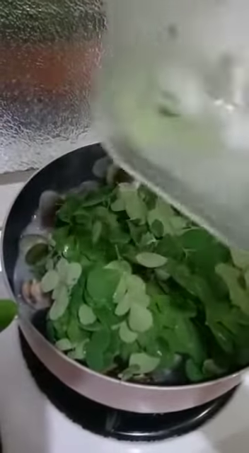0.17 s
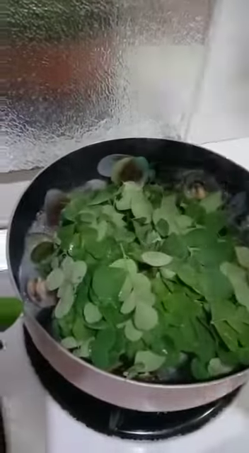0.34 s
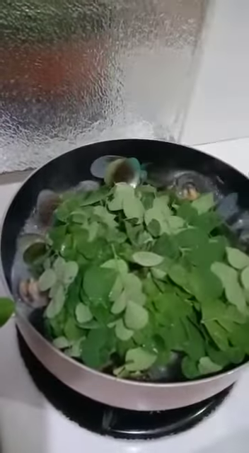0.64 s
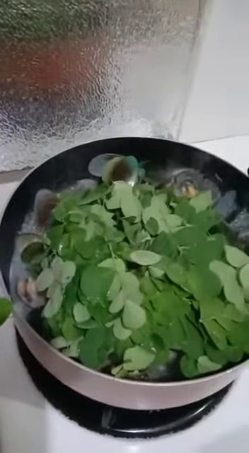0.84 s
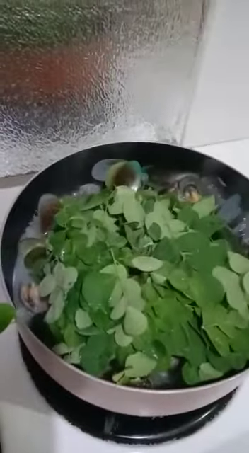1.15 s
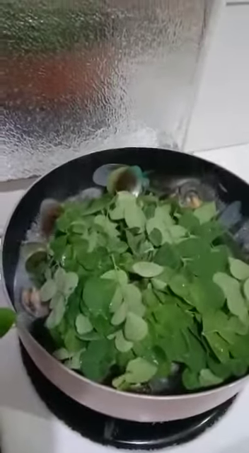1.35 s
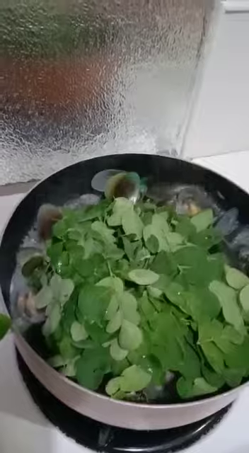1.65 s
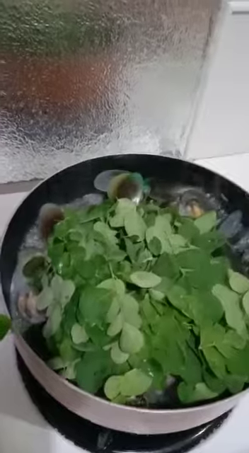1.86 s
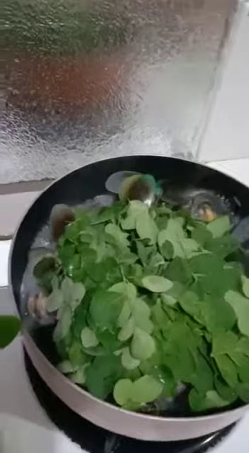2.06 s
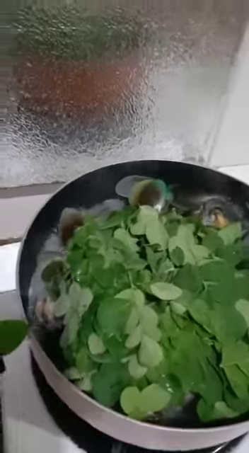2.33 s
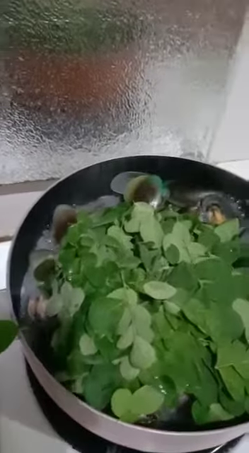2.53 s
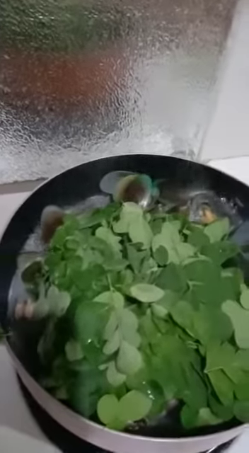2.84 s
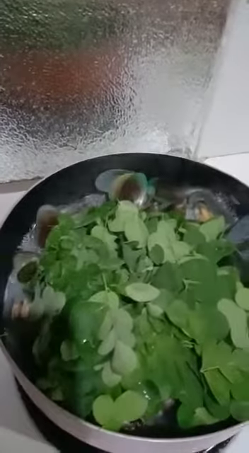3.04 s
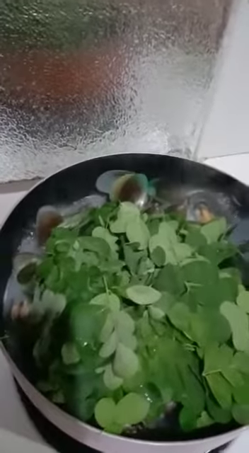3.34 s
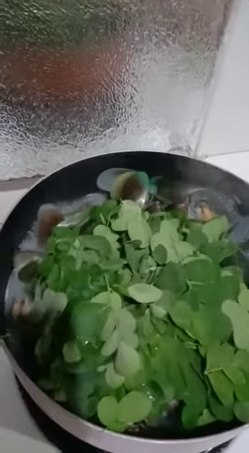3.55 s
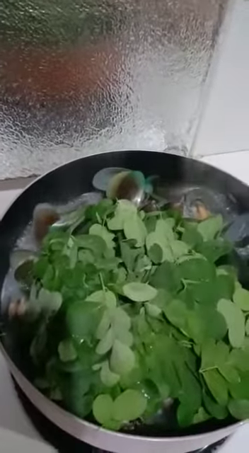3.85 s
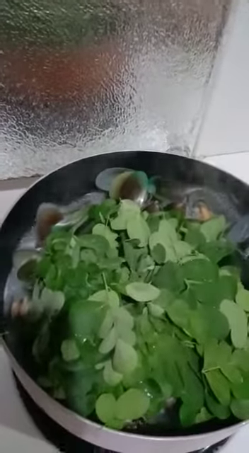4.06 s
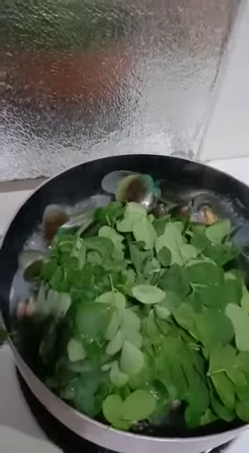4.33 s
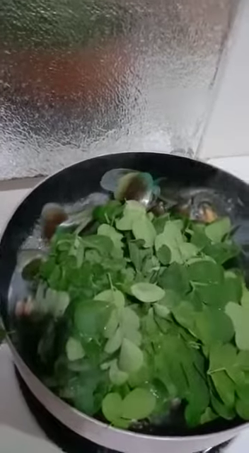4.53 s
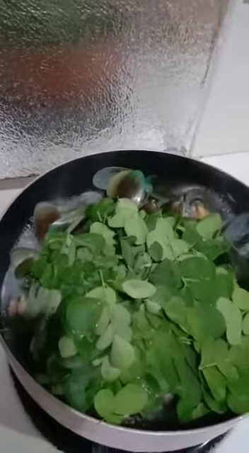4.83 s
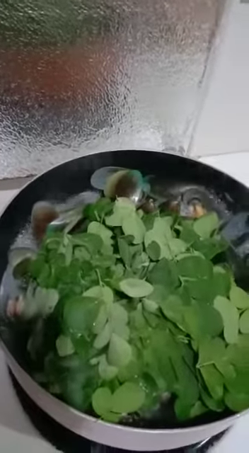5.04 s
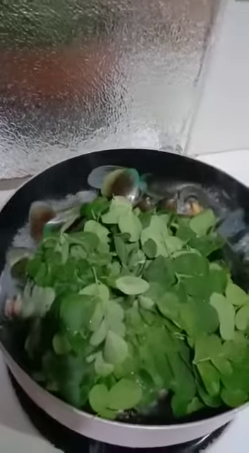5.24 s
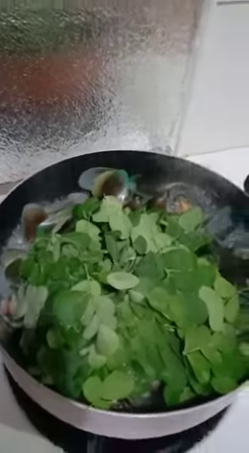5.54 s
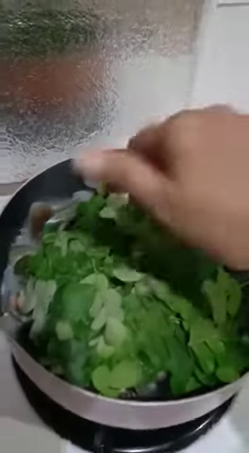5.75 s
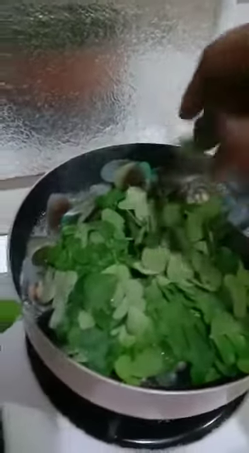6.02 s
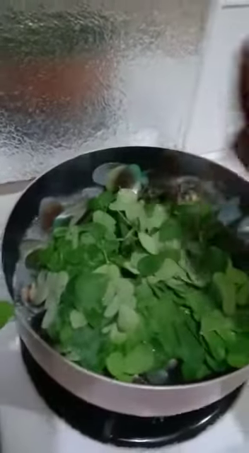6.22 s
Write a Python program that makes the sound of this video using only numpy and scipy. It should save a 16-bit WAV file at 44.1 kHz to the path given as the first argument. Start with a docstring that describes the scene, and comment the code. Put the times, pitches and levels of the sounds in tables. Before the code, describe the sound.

Gentle bubbling and fizzing come from a nearby pan on a stove, over a low steady hum. Early on, a metal bowl lands with a loud, bright clink, followed by a run of lighter pot knocks, brief scrapes and small rim tings. After that only the simmer remains, with a few blips, tiny spits and a soft rustle as a hand presses the leaves down. Hard kitchen walls add a short tail.

```python
"""Small tiled kitchen: a pan of greens simmers over a low electric hum.
Bursting bubbles make a wash, fizz and plops and keep the pan faintly ringing; water spits on its
hot wall, a hand pushes the leaves down. A metal bowl is put down with one sharp clink, then
kitchenware is shifted, scraped and knocked. Blows ring decaying modes; scrapes are tiny slips.
The hard walls add a short tail."""
import sys
import numpy as np
from scipy import signal
from scipy.fft import rfft, irfft, next_fast_len
from scipy.io import wavfile
from scipy.ndimage import uniform_filter1d

SR = 44100
rng = np.random.default_rng(int(sys.argv[2]) if len(sys.argv) > 2 else 0)


def to_wav(s):
    """Save 16-bit WAV."""
    ch = np.atleast_2d(s).T  # columns
    pcm = np.round(np.clip(ch, -1, 1) * 32767)  # PCM
    wavfile.write(sys.argv[1], SR, pcm.astype(np.int16))


N = 281490
TIME_S = np.arange(N) / SR

# Boil strength contour: t/s, relative level/dB (compressed in simmer)
BOIL = [(0.0, -54.5), (0.21, -61.5), (0.62, -63.5), (1.31, -59), (3.71, -57), (4.35, -60), (4.87, -54),
        (5.47, -61), (5.85, -56.5), (6.38, -68)]
# Simmer spectra: f/Hz, relative density/dB
WASH_SPECTRUM = [(25, -40), (50, -19), (80, -0.5), (140, 7), (185, -3.5), (300, -1.5), (480, -6),
                 (640, -3.5), (900, -10.5), (1550, -12), (2100, -10), (2650, -15.5), (3500, -15.5),
                 (7000, -39.5)]
FIZZ_SPECTRUM = [(3000, -5.5), (3900, -4), (4400, -6), (5000, -1.5), (5600, -0.5), (6300, -10.5),
                 (6800, -6.5), (7400, -3), (8050, -12), (8800, -11), (10000, -7), (11200, -14),
                 (13700, -25), (14900, -11.5)]
# Pan modes: f/Hz, level/dB, t60/s, bubble rate/(1/s)
PAN_MODES = [(1163, -63, 0.063, 200), (1230, -61.5, 0.088, 190), (1277.4, -59.5, 0.11, 200),
             (2118, -78, 0.09, 70), (2978, -73, 0.029, 67), (3224, -74.5, 0.12, 100),
             (3785, -77.5, 0.17, 78), (5090, -77.5, 0.16, 100), (5660, -76, 0.043, 120),
             (6900, -81, 0.074, 140), (8850, -81.5, .04, 140), (9500, -82.5, 0.064, 150)]
# Largest bubbles: t/s, level/dB, f/Hz
BIG_BUBBLES = [(0.192, -46, 1240), (0.306, -39.5, 1230), (1.728, -41.5, 1255), (4.4654, -37, 1247),
               (4.938, -43.5, 340), (5.771, -43, 1327), (5.93, -49, 1620)]
# Water spits: t/s, level/dB
SPITS = [(1.964, -64.5), (3.483, -59), (4.781, -59.5), (4.88, -56.5)]
# Leaf rustles; kitchenware scrapes, the last row a bubble's brief burst at the pan: t/s, length/s, level/dB,
# centre f/Hz, width/oct
LEAF_RUSTLES = [(5.745, 0.057, -54, 640, 1.0), (5.95, .042, -57, 398, .45)]
SCRAPES = [(1.868, 0.032, -42.5, 1080, 1), (1.954, 0.022, -44, 3410, 0.1), (1.957, 0.05, -53.5, 4120, 0.42),
           (2.672, 0.0089, -49.5, 4130, 0.54), (2.971, 0.071, -42, 900, 1.29),
           (3.078, 0.035, -43, 1140, 1.3), (3.609, 0.016, -52, 2000, 1.2),
           (4.336, 0.019, -47.5, 2060, 0.31), (5.193, 0.031, -55.5, 2100, 0.29)]
# Modes of bowl (wall damped, rim clear), pot and pot rim: f/Hz, level/dB, t60/s
BOWL_MODES = [(1150, -4, .03), (1211, -13, .17), (1258, -15, .28), (1444, -26, .2), (2170, -21, .2),
              (2260, -5, .018), (2690, -6, .022), (3290, -26, .2), (3321, -23.5, .3), (3350, -26, .18),
              (5052, -31, .22), (6735, -15, .075), (6760, -31, .15), (8355, -37, .23), (9313, -28.5, .1),
              (10480, -39, .15), (11570, -49, .14), (14240, -48, .1)]
POT_MODES = [(790, -7, .02), (1010, -2, .022), (1110, 3, .026), (1270, -12, .11), (1850, -17, .28),
             (2000, -13, .02), (3370, -23, .15)]
RIM_MODES = [(3645, 5, 0.038), (5000, -12, 0.042), (6880, -16.5, 0.09), (8100, -13.5, 0.031),
             (8430, -19, .07), (9650, -18.5, .05)]
# Spectra of unresolved modes: f/Hz, relative density/dB
BOWL_CLATTER = [(80, -50), (250, -34), (420, -9.5), (700, -1), (1000, -2.5), (1500, 1.5), (2100, 2),
                (2600, -8), (3050, -1.5), (3700, -4), (4300, -15), (5500, -13.5), (6200, -35), (13000, -44)]
POT_CLATTER = [(70, -46), (200, -20), (450, -5.5), (720, 0), (1100, 5), (1500, -5), (2100, -0.5),
               (2900, -8.5), (3650, -10), (4200, -27), (8000, -45), (13000, -44)]
# Blows on bowl and pot rim: t/s, level/dB, tilt/(dB/oct)
BOWL_BLOWS = [(1.3183, -7, 0.5), (1.8625, -78, 15.5)]
RIM_BLOWS = [(3.3828, -33.5, -4.5), (3.979, -44.5, -2), (3.990, -40, 6)]
# Pot knocks: t/s, level/dB, tilt/(dB/oct), rebound/amplitude ratio
POT_KNOCKS = [(1.7775, -37.5, 2, 0), (1.877, -29.5, 1, 0.36), (2.0375, -36, 1, 0.83), (2.8005, -42, 2, 0.6),
              (2.9375, -38, -7, 0.3), (3.087, -36, -2.5, 0.3), (3.3826, -21, 0, 0.1),
              (3.5585, -35, -1, 0.1), (3.728, -41.5, 0.5, 0.04), (3.9925, -22, -2.5, 0.21),
              (4.1195, -38.5, -7, 0)]
# Hum partials: f/Hz, level/dB, throb depth/1
HUM_PARTIALS = [(57.4, -68.5, 0.17), (119.5, -59.5, 0.55), (238.2, -61.5, 0.58), (356, -67.5, 0.67),
                (609, -71, 0.53)]
# Room decay: f/Hz, t60/s
ROOM_DECAY = [(200, 0.57), (600, 0.2), (1200, 0.3), (2500, 0.32), (5000, 0.25), (10000, 0.11)]


def simmer(wash_db=-56, fizz_db=-63.5, crackle_db=-76, compression=0.72):
    """Bursting bubbles make wash, fizz and crackle, and ring each pan mode."""
    times_s, levels_db = np.transpose(BOIL)
    boil = gain(compression * np.interp(TIME_S, times_s, levels_db - np.median(levels_db)))
    wash = gain(wash_db) * coloured(rng.standard_normal(N), WASH_SPECTRUM)
    fizz = gain(fizz_db) * coloured(clicks(9000, 1.4), FIZZ_SPECTRUM)
    bed = np.std(wash + fizz) * spurts(wash + fizz, depth_db=2.2)
    pan = np.zeros(N)
    for hz, db, t60_s, per_s in PAN_MODES:
        mode = signal.oaconvolve(clicks(per_s, 4.65), ring([(hz, 0, t60_s)]))[:N]
        pan += gain(db) * unit_rms(mode)
    crackle_hz_db = [(1000, -1), (3500, -1), (9500, -14), (13000, -24)]
    crackle = gain(crackle_db) * coloured(clicks(92, 2.0), crackle_hz_db)
    return bed * boil ** 0.16 + boil * (pan + crackle)


def spurts(x, depth_db):
    """Patches of about 40 ms by 250 Hz swell and sink; rms 1."""
    bins = signal.stft(x, nperseg=1024, noverlap=768)[2]
    field = uniform_filter1d(rng.standard_normal(bins.shape), size=6, axis=0)
    field = unit_rms(uniform_filter1d(field, size=7, axis=1))
    return unit_rms(signal.istft(bins * gain(depth_db * field), nperseg=1024, noverlap=768)[1][:N])


def plops(t60_s=0.079, splash_db=-13, splash_decay_s=0.016):
    """Each bubble bursts with a short tone and a wet splash."""
    out, t = np.zeros(N), np.arange(4096) / SR
    splash_hz_db = [(100, -15), (400, 4.5), (1800, 8), (6000, -39)]
    splashing = coloured(rng.standard_normal(N + len(t)), splash_hz_db)
    for at_s, db, hz in BIG_BUBBLES + small_bubbles():
        splash = splashing[round(at_s * SR):][:len(t)]
        add(out, at_s, gain(db) * ring([(hz, 0, t60_s)]))
        add(out, at_s, gain(db + splash_db) * splash * np.exp(-t / splash_decay_s))
    return kitchen(out, wet_db=-12)


def small_bubbles(per_s=2, level_db=-53.5, spread_db=1, glug_share=0.45):
    """Deep bubbles glug, shallow ones blip near the pan's note. Rows: t/s, level/dB, f/Hz."""
    glug_hz, blip_hz = (253, 393), (1184, 1300)
    rows = []
    for slot, (when, size, depth, pitch) in enumerate(rng.random((64, 4))):
        low_hz, high_hz = glug_hz if depth < glug_share else blip_hz
        db = level_db + spread_db * (2 * size - 1)
        rows.append(((slot + when) / per_s, db, low_hz + pitch * (high_hz - low_hz)))
    return [row for row in rows if row[0] < N / SR]


def spits(length_s=0.042, centre_hz=8750, width_oct=0.3):
    """Water on the hot pan wall: a short, high hiss of tiny bursts."""
    rows = [(at_s, length_s, db, centre_hz, width_oct) for at_s, db in SPITS]
    return grain_bursts(rows, spread_db=7.5, skirt=1.2)


def bowl_clinks():
    """Metal bowl put down: clear modes over a cracking clatter."""
    tones = kitchen(strikes(BOWL_BLOWS, BOWL_MODES, rise_s=0.00027), wet_db=-4.5)
    return tones + clatter(BOWL_BLOWS, BOWL_CLATTER, level_db=-15, bass_t60_s=0.55, crack=1.2)


def pot_knocks(rebound_s=0.018):
    """Pot hits the counter; landing tilted, it touches again."""
    blows = [(at_s, db, tilt) for at_s, db, tilt, _ in POT_KNOCKS]
    blows += [(at_s + rebound_s, db + 20 * np.log10(rebound), tilt)
              for at_s, db, tilt, rebound in POT_KNOCKS if rebound > 0]
    tones = kitchen(strikes(blows, POT_MODES, rise_s=0.00035), wet_db=-6)
    return tones + clatter(blows, POT_CLATTER, level_db=-13.5, bass_t60_s=0.33, crack=0.05)


def rim_tings():
    """Touches ring the pot rim's high modes."""
    return kitchen(strikes(RIM_BLOWS, RIM_MODES, rise_s=0.00049), wet_db=-8)


def strikes(blows, modes, rise_s):
    """Each blow rings the object's clear modes."""
    out = np.zeros(N)
    for at_s, db, tilt_db_oct in blows:
        add(out, at_s, gain(db) * ring(modes, tilt_db_oct, rise_s))
    return out


def ring(modes, tilt_db_oct=0, rise_s=0.00032):
    """Decaying modes; harder contact tilts them toward the treble."""
    t, out = np.arange(SR // 2) / SR, 0
    main_hz = max(modes, key=lambda mode: mode[1])[0]
    for k, (hz, db, t60_s) in enumerate(modes):
        level_db = db + tilt_db_oct * np.log2(hz / main_hz) - 60 * t / t60_s
        out += (-1) ** k * gain(level_db) * np.sin(2 * np.pi * hz * t)  # neighbours swing opposite ways
    return out * (1 - np.exp(-t / rise_s))


def clatter(blows, spectrum, level_db, bass_t60_s, crack, rise_s=0.0005, crack_s=0.004):
    """Dense modes: a brief crack, then noise whose treble dies first."""
    out, t = np.zeros(N), np.arange(16384) / SR
    attack = (1 - np.exp(-t / rise_s)) * (1 + crack * np.exp(-(t / crack_s) ** 2))
    for at_s, db, tilt_db_oct in blows:
        tilted = [(hz, band_db + tilt_db_oct * np.log2(hz / 1000)) for hz, band_db in spectrum]
        hz, frame_s, bins = signal.stft(coloured(rng.standard_normal(len(t)), tilted), SR, nperseg=256)
        t60_s = bass_t60_s / np.sqrt(1 + hz[:, None] / 2500)
        wash = signal.istft(bins * gain(-60 * frame_s / t60_s), SR, nperseg=256)[1][:len(t)]
        add(out, at_s, gain(db + level_db) * wash * attack)
    return out


def rubs():
    """Tiny slips of shifted kitchenware and of leaves under a hand, and one bubble's brief burst."""
    return grain_bursts(SCRAPES + LEAF_RUSTLES, spread_db=2.5, skirt=2.1)


def grain_bursts(rows, spread_db, skirt, size=32768):
    """Dense band-limited clicks; fast swell, then decay."""
    out, pulses = np.zeros(N), clicks(5000, spread_db)
    hz = np.fft.rfftfreq(size, 1 / SR) + 1
    for at_s, length_s, db, centre_hz, width_oct in rows:
        progress = np.arange(size) / SR / length_s
        envelope = np.minimum(progress / 0.14, 1) * np.exp(-progress ** 3)
        band = (1 + (np.log2(hz / centre_hz) / width_oct) ** 2 / (2 * skirt)) ** (-2 * skirt)
        grains = unit_rms(irfft(rfft(pulses[round(at_s * SR):][:size], size) * band))
        add(out, at_s, gain(db) * grains * envelope)
    return out


def hum(throb_hz=12.6, wander_hz=9.1):
    """Electric hum: near-steady fundamental, overtones uneven in level and phase."""
    out = np.zeros(N)
    for hz, db, throb in HUM_PARTIALS:
        envelope = np.exp(throb * drift(throb_hz))
        phase_rad = 2 * np.pi * hz * TIME_S + 0.92 * throb * drift(wander_hz)
        out += gain(db) * unit_rms(envelope * np.sin(phase_rad))
    return out


def kitchen(x, wet_db, first_echo_s=0.0023):
    """Direct sound plus dense tile reflections, decaying per band."""
    t = np.arange(SR * 3 // 4) / SR
    hz, frame_s, bins = signal.stft(rng.standard_normal(len(t)), SR, nperseg=256)
    bins = np.exp(1j * np.angle(bins)) * gain(-60 * frame_s / lookup(ROOM_DECAY, hz)[:, None])
    tail = signal.istft(bins, SR, nperseg=256)[1][:len(t)] * (t > first_echo_s)
    return x + gain(wet_db) * signal.fftconvolve(x, tail / np.linalg.norm(tail))[:N]


def side_hiss(level_db=-77):
    """Faint hiss, antiphase between left and right."""
    hiss_hz_db = [(40, -7), (120, -2), (400, -4), (1200, -2.5), (3000, -13.5), (10000, -33), (15000, -14)]
    return gain(level_db) * coloured(rng.standard_normal(N), hiss_hz_db) * np.array([[1], [-1]])


def clicks(per_s, spread_db):
    """Random impulses, most small, a few large."""
    place, chance, sign = rng.random((int(per_s * N / SR) + 1, 3)).T
    size = gain(spread_db * np.minimum(-np.log(1 - chance), 4))
    return np.bincount((place * N).astype(int), size * np.sign(sign - 0.5), N)


def drift(cutoff_hz, size=4096):
    """Slow noise, rms 1."""
    hz = np.fft.rfftfreq(size, N / SR / size)
    slow = irfft(rfft(rng.standard_normal(size)) / (1 + (hz / cutoff_hz) ** 4))
    return unit_rms(np.interp(TIME_S, np.linspace(0, N / SR, size), slow))


def coloured(x, spectrum):
    """Filter by a spectrum (f/Hz, level/dB); rms 1."""
    size = next_fast_len(len(x))
    response = gain(lookup(spectrum, np.fft.rfftfreq(size, 1 / SR)))
    return unit_rms(irfft(rfft(x, size) * response, size)[:len(x)])


def lookup(table, hz):
    """Interpolate over log frequency."""
    table_hz, values = np.transpose(table)
    return np.interp(np.log(hz + 1), np.log(table_hz + 1), values)


def add(mix, at_s, sound):
    """Mix in place."""
    part = mix[round(at_s * SR):][:len(sound)]
    part += sound[:len(part)]


def gain(db):
    """dB to amplitude."""
    return 10 ** (np.asarray(db) / 20)


def unit_rms(x):
    """Scale to rms 1."""
    return x / np.sqrt(np.mean(x ** 2) + 1e-20)


def scene():
    """All sources centred, hiss at the sides."""
    blows = bowl_clinks() + pot_knocks() + rim_tings()
    grains = kitchen(rubs() + spits(), wet_db=-8)
    return blows + grains + simmer() + plops() + hum() + side_hiss()


def record(dry, low_hz=45, high_hz=15500):
    """Microphone bass roll-off, then band limit."""
    thinned = signal.sosfilt(signal.butter(4, low_hz, "highpass", fs=SR, output="sos"), dry)
    lowpass = signal.firwin(511, high_hz, window=("kaiser", 9), fs=SR)
    return signal.oaconvolve(thinned, lowpass[None], "same")


dry = scene()
out = record(dry)
to_wav(out)
```